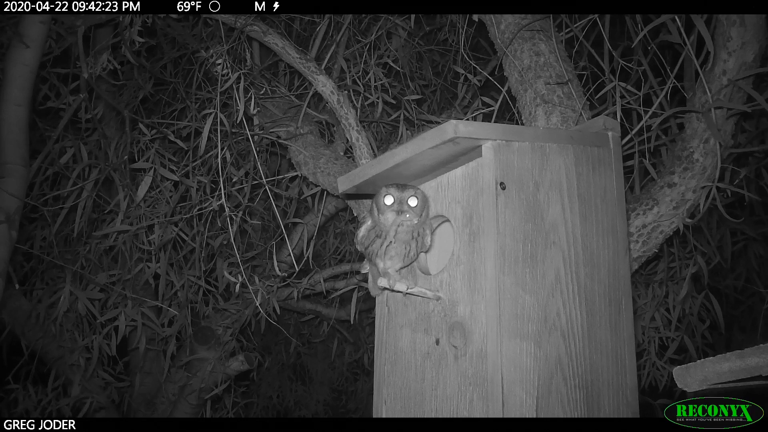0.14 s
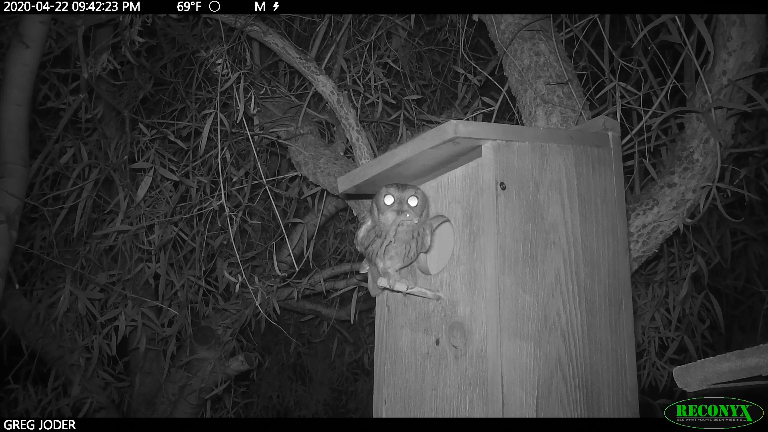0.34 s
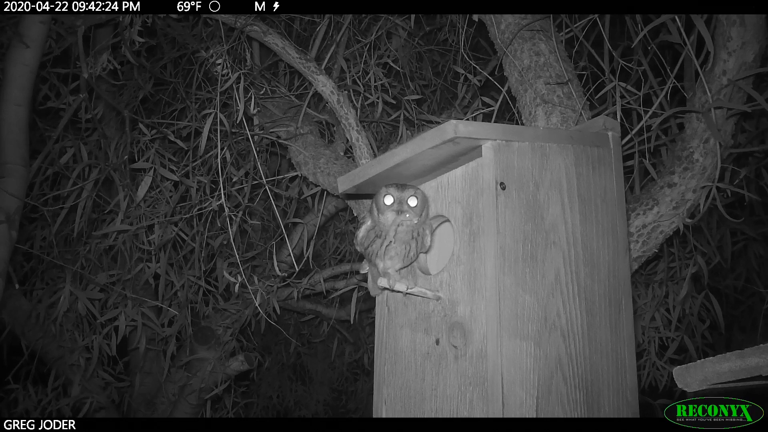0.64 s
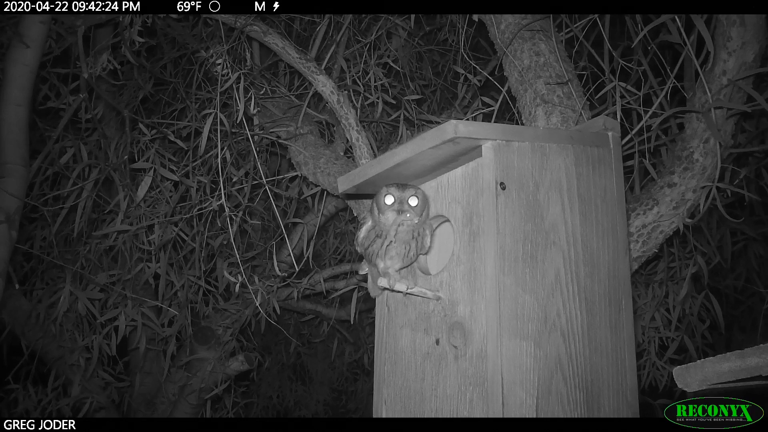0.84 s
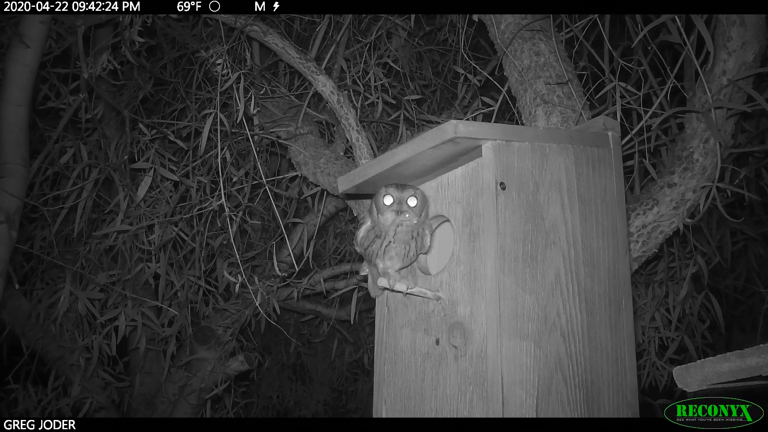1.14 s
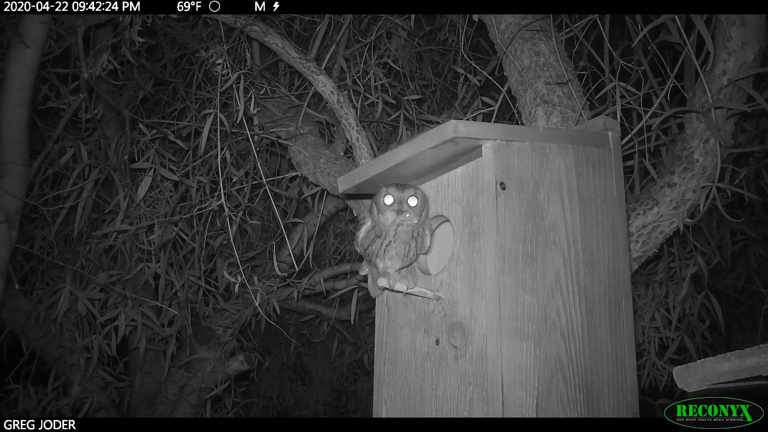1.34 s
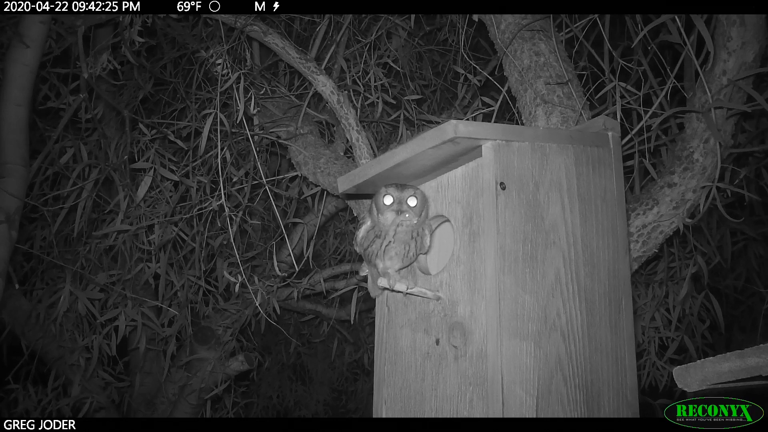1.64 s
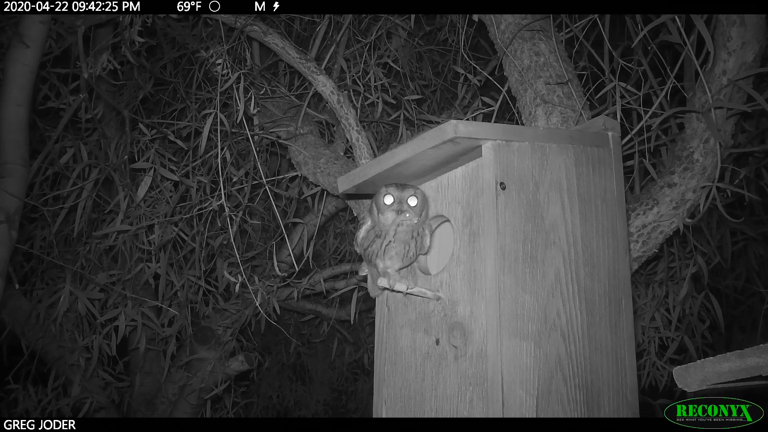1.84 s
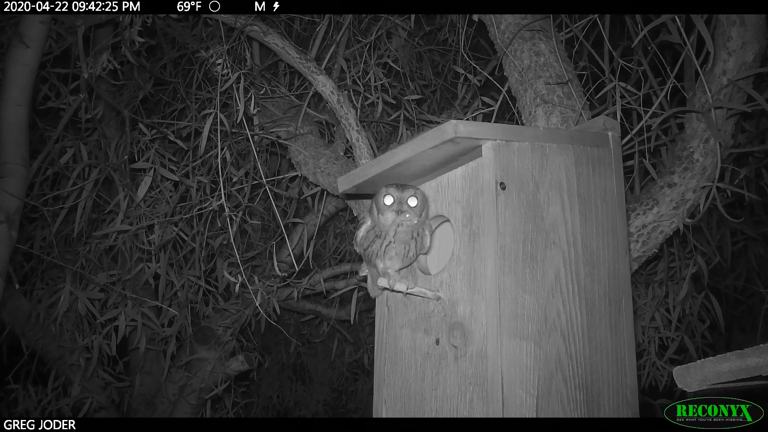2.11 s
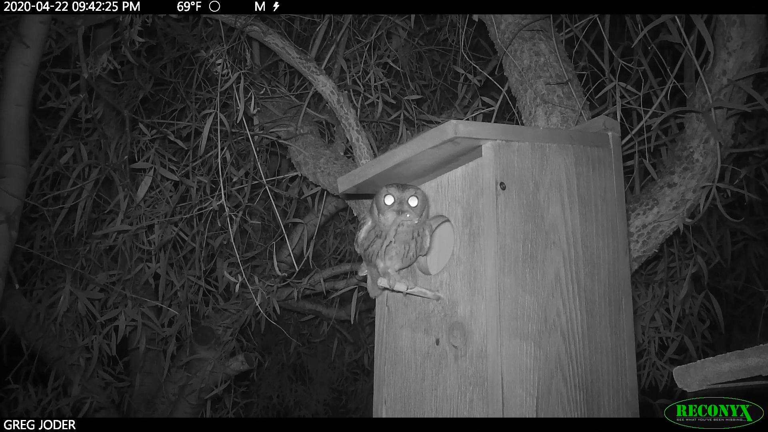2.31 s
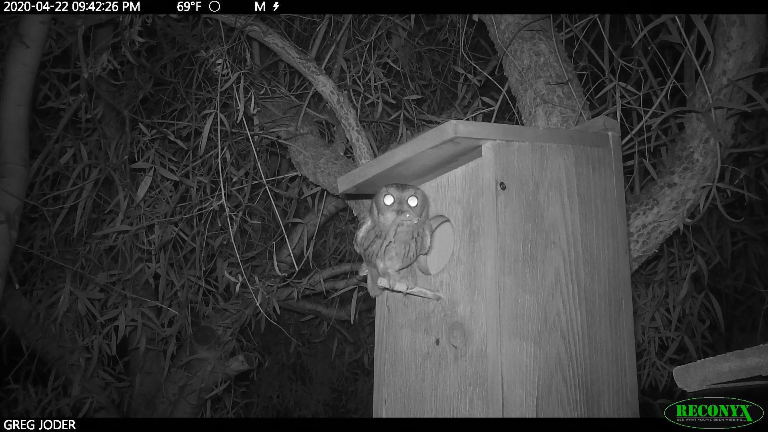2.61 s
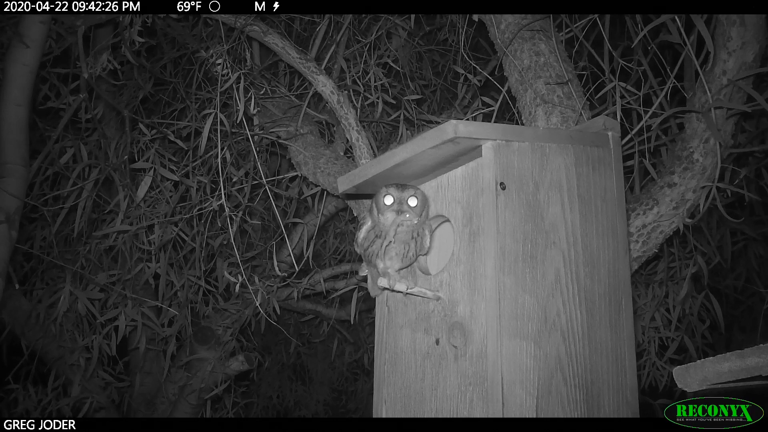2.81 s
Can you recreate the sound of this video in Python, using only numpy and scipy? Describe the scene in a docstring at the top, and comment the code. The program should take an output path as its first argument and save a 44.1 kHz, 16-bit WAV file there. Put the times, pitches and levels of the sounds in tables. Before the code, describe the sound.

Short mellow owl notes repeat over fast, high, two-pulse cricket chirps and a fluttering distant insect chorus. Leaves tick and rustle faintly, with soft low bumps at the microphone and a distant rumble, outdoors at night.

```python
"""A low distant rumble, a faint hum and hiss, and a fluttering far insect chorus come first: shaped noise and tones.
Dry ticks and faint rustles follow, made of short noise bursts and crackles, among soft low bumps.
A near cricket repeats a two-pulse chirp of brief tones about seven times a second.
Faint far calls and the soft, mostly falling hoots of a small owl are near-pure tones that bend in pitch.
It is night in a thicket by a wooden nest box; echoes and leafy scatter surround the voices."""
import sys
import numpy as np
from scipy import signal
from scipy.fft import rfft, irfft
from scipy.io import wavfile

SR = 44100
rng = np.random.default_rng(int(sys.argv[2]) if len(sys.argv) > 2 else 0)


def inscribe(sig):
    """Save sig as 16-bit PCM at rate SR to the path in sys.argv[1].

    A 1-D sig is mono; a 2-D sig holds one channel per row.
    Samples are clipped to [-1, 1] before scaling.
    """
    pcm = np.round(np.clip(np.atleast_2d(sig).T, -1, 1) * 32767)
    wavfile.write(sys.argv[1], SR, pcm.astype(np.int16))


N = 130536  # length of the scene in samples


def from_db(db):
    """Turn decibels into a gain."""
    return 10 ** (np.asarray(db) / 20)


def rms_one(x):
    """Scale a sound to an average strength (rms) of 1."""
    return x / np.sqrt(np.mean(x ** 2) + 1e-20)


def drift(rate_hz, size):
    """Smooth random wandering with a spread of about 1; a higher rate wanders faster."""
    pole = np.exp(-2 * np.pi * rate_hz / SR)
    lead_in = SR // 4  # lets the filter settle before the part we keep
    slow = signal.lfilter([1], [1, -2 * pole, pole * pole], rng.standard_normal(size + lead_in))
    return rms_one(slow)[-size:]


def coloured(x, spectrum):
    """Make some pitches of a sound stronger than others, then scale it to unit rms."""
    table_hz, table_db = np.transpose(spectrum)
    hz = np.maximum(np.fft.rfftfreq(N, 1 / SR), 1)
    gain = from_db(np.interp(np.log(hz), np.log(table_hz), table_db))
    return rms_one(irfft(rfft(x) * gain, N))


def noise(spectrum):
    """Steady random noise of unit rms with the given colour."""
    return coloured(rng.standard_normal(N), spectrum)


def in_time(rows):
    """Join (time, value) points into a curve with a value at every sample."""
    return np.interp(np.arange(N) / SR, *np.transpose(rows))


def add(out, start, sound):
    """Mix a sound in at a start time in seconds."""
    i = max(int(start * SR), 0)
    out[i:i + len(sound)] += sound[:max(N - i, 0)]


def envelope(t, attack, release):
    """Rounded rise, hold and rounded fall in loudness."""
    rise = np.sin(np.pi / 2 * np.clip(t / attack, 0, 1))
    fall = np.sin(np.pi / 2 * np.clip((t[-1] - t) / release, 0, 1))
    return rise * fall


def tone(hz, wobble, rough, rate_hz, second_db=-80):
    """A near-sine with a weak octave, unsteady in pitch (wobble) and strength (rough)."""
    unsteady_hz = hz * (1 + wobble * drift(rate_hz, len(hz)))
    phase = 2 * np.pi * (np.cumsum(unsteady_hz) / SR + rng.random())
    wave = np.sin(phase) + from_db(second_db) * np.sin(2 * phase)
    return wave * (1 + rough * drift(rate_hz, len(hz)))


# colour of the distant rumble and hiss: (f/Hz, relative level/dB)
AIR_COLOUR = [(12, 4.5), (28, .5), (42, .5), (60, -3), (100, -4.5), (160, -5.5), (220, -12.5), (320, -16.3),
              (500, -17.3), (750, -19), (1000, -23), (1500, -24), (2500, -27.7), (4500, -30.4), (9000, -32),
              (15000, -34.5)]
AIR_DB = -50.75
# swells and fades of the distant midrange wash: (t/s, level/dB)
WASH_LEVEL = [(0, -64), (.45, -63.5), (.64, -60.5), (.8, -67), (1.25, -68.5), (1.6, -65), (1.8, -69),
              (2.2, -71), (2.96, -68.5)]
# colour of the wash: (f/Hz, relative level/dB)
WASH_COLOUR = [(300, -19.5), (600, -5.5), (850, -1.5), (1200, -4.5), (1500, -7), (2200, -19), (4000, -30)]
# low wavering hum, one row per tone: (f/Hz, level/dB)
HUM_TONES = [(42, -59), (89, -63), (120, -63), (162, -63), (180, -68.5), (243, -73)]
HUM_PITCH_WOBBLE, HUM_WAVER, HUM_WAVER_HZ = .01207, .6, 5.94


def background():
    """Random noise makes the rumble, hiss and wash; unsteady tones make the hum."""
    hum = np.zeros(N)
    for hz, db in HUM_TONES:
        hum_tone = tone(np.full(N, hz), HUM_PITCH_WOBBLE, HUM_WAVER, HUM_WAVER_HZ)
        hum += from_db(db) * rms_one(hum_tone)
    air = from_db(AIR_DB) * noise(AIR_COLOUR)
    wash = from_db(in_time(WASH_LEVEL)) * noise(WASH_COLOUR)
    return air + wash + hum


STRAYS_PER_S, STRAY_SPREAD_DB, STRAY_RING_S, STRAY_DB = 200, 5, .0006, -65
STRAY_LOW_HZ, STRAY_HIGH_HZ = 5670, 7620


def stray_clicks():
    """Single clicks of scattered insects, each ringing briefly at its own pitch."""
    out, t = np.zeros(N), np.arange(SR // 100) / SR
    for when, pitch, size in rng.random((int(STRAYS_PER_S * N / SR), 3)):
        hz = STRAY_LOW_HZ + pitch * (STRAY_HIGH_HZ - STRAY_LOW_HZ)
        gain = from_db(STRAY_SPREAD_DB * min(-np.log(size), 3))  # a few clicks are much louder
        ring = t * np.exp(-t / STRAY_RING_S) * np.sin(2 * np.pi * hz * t)
        add(out, when * N / SR, gain * ring)
    return from_db(STRAY_DB) * rms_one(out)


# colour of the far insect chorus: (f/Hz, relative level/dB)
CHORUS_COLOUR = [(4500, -32), (5300, -10.5), (5750, -.5), (6120, 4), (6600, -3), (7200, -6.5),
                 (8000, -12.5), (9300, -19), (12000, -39)]
# swell of the chorus, used only as ups and downs about its mean: (t/s, level/dB)
CHORUS_SWELL = [(0.02, -58.5), (0.41, -57.5), (0.79, -61.5), (1.22, -58.5), (1.65, -60.5), (1.95, -58),
                (2.26, -61.5), (2.35, -61.5), (2.64, -58.5), (2.95, -58)]
CHORUS_FOLLOWS = .8  # share of those ups and downs that is applied
CHORUS_DB, CHORUS_FLUTTER_DB, CHORUS_SWELL_DB = -60.8, 2.3, 1.1  # before the swell; random spreads
TRILL_HZ, TRILL_DRIFT_HZ, TRILL_DB = 9820, 53, -80.5


def chorus():
    """Many far insects merge into a fluttering, grainy band, with one thin trill above."""
    swell_db = in_time(CHORUS_SWELL)
    swell_db = CHORUS_FOLLOWS * (swell_db - swell_db.mean()) + CHORUS_SWELL_DB * drift(11, N)
    flutter_db = CHORUS_FLUTTER_DB * drift(100, N)
    band = from_db(CHORUS_DB + flutter_db) * noise(CHORUS_COLOUR)
    # random changes of strength blur the trill into a narrow band
    trill = drift(TRILL_DRIFT_HZ, N) * np.sin(2 * np.pi * TRILL_HZ * np.arange(N) / SR)
    return from_db(swell_db) * (band + stray_clicks()) + from_db(TRILL_DB) * rms_one(trill)


# brief high rustles: (centre t/s, half length t/s, level/dB)
RUSTLES = [(.087, .012, -54), (.35, .015, -60), (.463, .012, -63), (.603, .01, -62), (.66, .012, -63),
           (1.25, .018, -63.5), (1.36, .022, -61), (1.635, .015, -64), (1.777, .028, -59.5),
           (1.935, .035, -63.5), (2.425, .012, -64), (2.515, .022, -63)]
# colour of the rustles: (f/Hz, relative level/dB)
RUSTLE_COLOUR = [(3000, -24), (5500, -29), (7000, 0), (8200, -6.5), (10000, -27.5), (15000, -24)]
CRACKLES_PER_S, CRACKLE_SPREAD_DB = 2500, 3


def rustles():
    """Tiny random crackles are heard wherever the leaves stir."""
    t, stir = np.arange(N) / SR, np.zeros(N)
    for centre, half, db in RUSTLES:
        stir += from_db(db) * np.exp(-.5 * ((t - centre) / half) ** 2)
    sizes = from_db(CRACKLE_SPREAD_DB * np.minimum(rng.exponential(1, N), 3))
    signed_sizes = sizes * rng.choice([-1, 1], N)
    crackles = signed_sizes * (rng.random(N) < CRACKLES_PER_S / SR)
    return stir * coloured(crackles, RUSTLE_COLOUR)


# dry ticks in the foliage: (t/s, f/Hz, half width as a share of f, decay t/s, level/dB)
TICKS = [(.0803, 7350, .11, .0013, -38.5), (.0905, 7700, .12, .002, -51), (.142, 4800, .15, .0012, -55),
         (.180, 7050, .07, .0016, -47), (.296, 5220, .05, .0018, -49), (.4602, 7600, .12, .0013, -48.5),
         (.5952, 6500, .25, .0014, -46), (.840, 7600, .12, .001, -52), (1.048, 2800, .3, .006, -59),
         (1.1295, 1660, .25, .0025, -49), (1.2343, 7400, .15, .0012, -49), (1.27, 1000, .18, .004, -52),
         (1.320, 7600, .07, .0016, -49), (1.374, 7800, .14, .0012, -50), (1.4885, 5400, .2, .0011, -51),
         (1.567, 1450, .12, .006, -54), (1.609, 4000, .12, .005, -58), (1.6147, 7350, .06, .002, -50),
         (1.737, 8000, .15, .0012, -51), (1.7833, 8200, .1, .0012, -51), (1.8495, 4700, .13, .0016, -52),
         (1.8834, 7500, .13, .0012, -42.5), (1.992, 5100, .1, .0016, -51), (2.0329, 7300, .14, .0015, -47),
         (2.033, 2550, .3, .0014, -50.5), (2.1375, 5050, .08, .0015, -53), (2.2255, 4900, .14, .0012, -54),
         (2.4805, 2500, .4, .002, -54), (2.488, 5100, .07, .0016, -52), (2.504, 8700, .16, .0012, -52),
         (2.539, 7350, .09, .0018, -49), (2.6073, 7350, .06, .0014, -51), (2.7142, 6900, .15, .0014, -48),
         (2.9068, 7400, .13, .0012, -45.5)]
TICK_BODY_DB = -24  # plain noise snap under the ring, before the tick's own level


def ticks():
    """A dying noise snap goes through a narrow filter, giving each tick its own brief ring."""
    out, t = np.zeros(N), np.arange(SR // 40) / SR
    for start, hz, width, decay, db in TICKS:
        fade = np.exp(-t / decay)
        snap = rng.standard_normal(len(t)) * fade
        edges = np.clip([hz * (1 - width), hz * (1 + width)], 100, .45 * SR)
        band_filter = signal.butter(2, edges, "band", fs=SR, output="sos")
        # give the ring the average strength of the fade
        ring = rms_one(signal.sosfilt(band_filter, snap)) * np.sqrt(np.mean(fade ** 2))
        add(out, start, from_db(db) * (ring + from_db(TICK_BODY_DB) * snap))
    return out


# near cricket, one row per chirp: (long pulse t/s, lead of the short pulse t/s, relative level/dB)
CHIRPS = [(0.1139, 0.0229, 0.9), (0.2559, 0.0239, -0.3), (0.402, 0.0234, 0.1), (0.5601, 0.0235, 0.6),
          (0.7066, 0.0236, -0.0), (0.8535, 0.0241, -0.2), (0.9992, 0.0234, -0.0), (1.1502, 0.0237, 0.7),
          (1.296, 0.0234, 0.2), (1.4456, 0.0229, -0.6), (1.5902, 0.0237, 0.6), (1.731, 0.0233, -0.5),
          (1.876, 0.0232, 0.4), (2.0169, 0.0234, 0.4), (2.1682, 0.0268, -3.1), (2.3224, 0.0217, -0.7),
          (2.4713, 0.0223, 0.0), (2.6167, 0.0236, 0.5), (2.7588, 0.0239, 0.5), (2.9075, 0.0235, 0.4)]
# two wing strokes of the short pulse, then two of the long pulse;
# each: (length t/s, first f/Hz, last f/Hz, attack t/s, level/dB before the chirp's own)
SHORT_FIRST = (.0042, 6560, 6380, .0017, -46.5)
SHORT_SECOND = (.0046, 6270, 5960, .002, -42.3)
LONG_FIRST = (.0068, 6620, 6430, .0015, -42)
LONG_SECOND = (.0044, 6290, 5960, .0017, -40.8)
SHORT_CATCH_S, LONG_CATCH_S = .0034, .0064  # from a pulse's start to its second stroke
STROKE_RELEASE_S, STROKE_SPREAD_DB = .0016, .6
WING_WOBBLE, WING_ROUGH = .0094, .11


def cricket():
    """Each pulse catches once midway, making two strokes; a stroke's tone falls as the wing slows."""
    out = np.zeros(N)
    for start, lead, chirp_db in CHIRPS:
        strokes = [(-lead, SHORT_FIRST), (SHORT_CATCH_S - lead, SHORT_SECOND),
                   (0, LONG_FIRST), (LONG_CATCH_S, LONG_SECOND)]
        for offset, (length, first_hz, last_hz, attack, db) in strokes:
            t = np.arange(int(length * SR)) / SR
            pitch = np.linspace(first_hz, last_hz, len(t))
            stroke = tone(pitch, WING_WOBBLE, WING_ROUGH, 900)
            gain = from_db(chirp_db + db + STROKE_SPREAD_DB * rng.normal())
            add(out, start + offset, gain * stroke * envelope(t, attack, STROKE_RELEASE_S))
    return out


# far calls: (start t/s, length t/s, top f/Hz, rise f/Hz, fall f/Hz, level/dB)
FAR_CALLS = [(.115, .035, 896, 70, 50, -59), (.817, .028, 786, 40, 20, -56),
             (.893, .028, 790, 20, 90, -55.5), (1.025, .033, 845, 40, 30, -60),
             (1.395, .022, 720, 50, 50, -57), (1.465, .028, 770, 60, 30, -53),
             (1.76, .025, 808, 40, 20, -56), (1.897, .087, 895, 50, 180, -54.5),
             (2.042, .026, 640, 60, 0, -52.5), (2.028, .08, 761, 100, 60, -55),
             (2.163, .122, 762, 95, 80, -56), (2.452, .03, 676, 30, 50, -55)]
FAR_WOBBLE, FAR_ROUGH = .014, .28


def far_calls():
    """Thin, wavering tones whose pitch climbs to a top and bends down again."""
    out = np.zeros(N)
    for start, length, top_hz, rise_hz, fall_hz, db in FAR_CALLS:
        t = np.arange(int(length * SR)) / SR
        arch = 2 * t / length - 1  # -1 at the start, 0 at the top, 1 at the end
        pitch = top_hz - np.where(arch < 0, rise_hz, fall_hz) * arch ** 2
        voice = tone(pitch, FAR_WOBBLE, FAR_ROUGH, 91, second_db=-26)
        add(out, start, from_db(db) * voice * envelope(t, .45 * length, .3 * length))
    return out


# soft low bumps at the microphone: (t/s, peak level/dB)
BUMPS = [(.254, -45), (.307, -42), (.48, -42), (.572, -45), (1.168, -45), (1.607, -41), (1.783, -44),
         (2.005, -43), (2.029, -40), (2.097, -39), (2.148, -43), (2.448, -45), (2.54, -41), (2.938, -42)]
BUMP_WIDTH_S = .003


def bumps():
    """Each bump is one short, dull swing of pressure: a dip between two small rises."""
    out, t = np.zeros(N), np.arange(N) / SR
    for when, db in BUMPS:
        q = np.minimum(((t - when) / BUMP_WIDTH_S) ** 2, 100)
        out -= from_db(db) * (1 - q) * np.exp(-q / 2)
    return out


# owl hoots: (start t/s, length t/s, pitch f/Hz, fall over the note f/Hz (negative rises),
# opening offset f/Hz, closing offset f/Hz, attack as a share of the length, level/dB)
HOOTS = [(.334, .057, 502, -5, 165, 15, .34, -44), (.713, .056, 530, 10, 180, 0, .54, -41),
         (.786, .064, 553, 6, -55, 5, .6, -40.4), (.915, .026, 566, 30, -6, 0, .8, -49.5),
         (1.012, .033, 566, -30, -20, 0, .22, -45), (1.353, .053, 535, 3, 130, 15, .51, -42.2),
         (1.506, .053, 574, 70, 0, 15, .32, -41.4), (1.815, .063, 553, 25, 80, 25, .5, -40),
         (1.901, .055, 546, 18, 10, 15, .65, -41.2), (2.248, .056, 557, 62, 20, 25, .46, -39.2),
         (2.349, .06, 555, 44, -15, 50, .48, -39.2), (2.68, .054, 546, 36, 25, 0, .56, -38.4),
         (2.852, .059, 547, 36, -25, 0, .7, -38.2)]
HOOT_WOBBLE, HOOT_ROUGH, HOOT_SECOND_DB = .011, .09, -25
HOOT_FADE_S, HOOT_RELEASE_S, SETTLE_S = .002, .017, .011  # extra length; fade-out; pitch slide


def owl():
    """Near-pure hoots slide onto their pitch as they swell, mostly sag, and often lift as they fade."""
    out = np.zeros(N)
    for start, length, hz, fall_hz, opening_hz, closing_hz, attack_share, db in HOOTS:
        t = np.arange(int((length + HOOT_FADE_S) * SR)) / SR
        pitch = hz + fall_hz * (.5 ** 2 - (t / length) ** 2)
        pitch += opening_hz * np.exp(-t / SETTLE_S)
        pitch += closing_hz * np.exp((t - t[-1]) / SETTLE_S)
        voice = tone(pitch, HOOT_WOBBLE, HOOT_ROUGH, 90, second_db=HOOT_SECOND_DB)
        add(out, start, from_db(db) * voice * envelope(t, attack_share * length, HOOT_RELEASE_S))
    return out


# echoes of the owl from trunks and ground: (delay t/s, level/dB)
ECHOES = [(.0236, -25), (.0329, -16.5), (.051, -29)]


def owl_echoes(hoots):
    """Trunks and ground send back later, weaker copies of the hoots."""
    out = np.zeros(N)
    for delay, db in ECHOES:
        add(out, delay, from_db(db) * hoots)
    return out


THICKET_T60_S = .2  # time for the scatter to die by 60 dB
OWL_WET_DB, CRICKET_WET_DB, FAR_WET_DB = -20, -12, -10  # how much of each voice is scattered


def thicket(x):
    """Leaves and branches scatter sound into a short tail, like many tiny random echoes."""
    t = np.arange(SR // 2) / SR
    decay = from_db(-60 * t / THICKET_T60_S)
    build_up = 1 - np.exp(-t / .0033)
    tail = rng.standard_normal(len(t)) * decay * build_up
    return signal.fftconvolve(x, tail / np.sqrt(np.sum(tail ** 2)))[:N]


def scene():
    """All the voices with their echoes, over the night background."""
    night = background() + chorus()
    foliage = rustles() + ticks()
    chirps, far, hoots = cricket(), far_calls(), owl()
    scattered = from_db(OWL_WET_DB) * hoots + from_db(CRICKET_WET_DB) * chirps + from_db(FAR_WET_DB) * far
    out = night + foliage + chirps + far + bumps() + hoots
    out += owl_echoes(hoots) + thicket(scattered)
    return out[None]


CUTOFF_HZ = 15250


def record(dry):
    """A steep low-pass filter removes the highest treble."""
    low_pass = signal.ellip(12, .1, 80, CUTOFF_HZ, fs=SR, output="sos")
    return signal.sosfilt(low_pass, dry)


dry = scene()
out = record(dry)
inscribe(out)
```